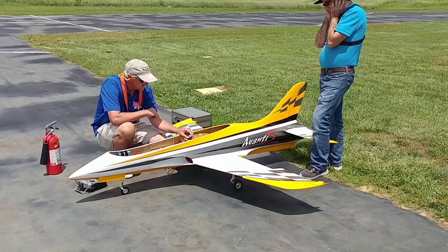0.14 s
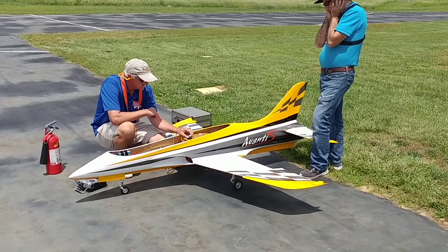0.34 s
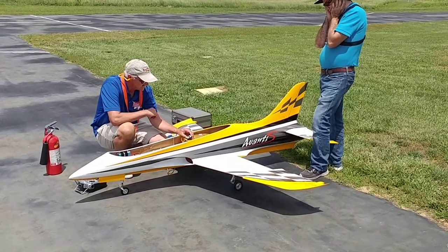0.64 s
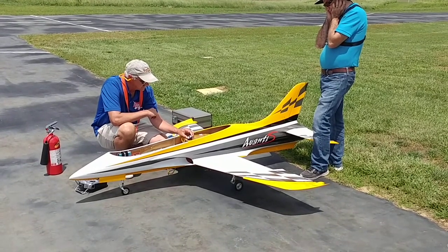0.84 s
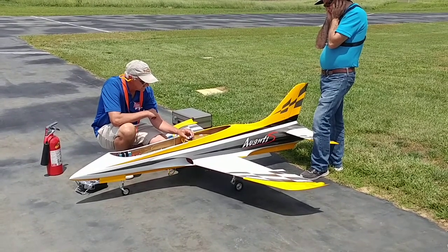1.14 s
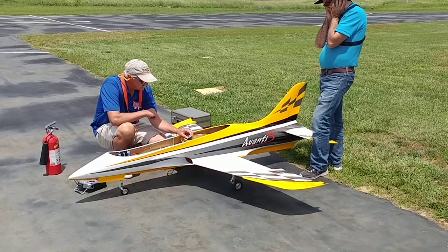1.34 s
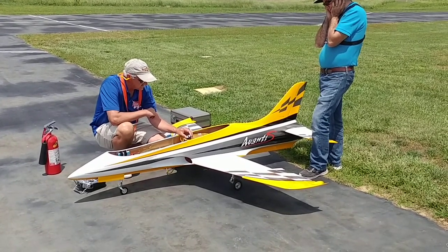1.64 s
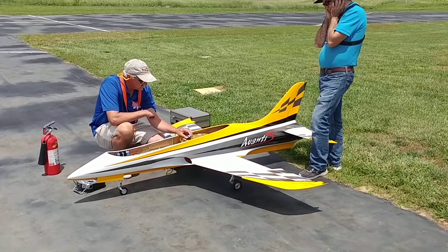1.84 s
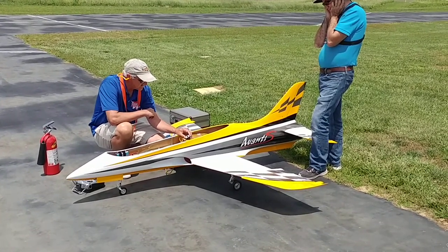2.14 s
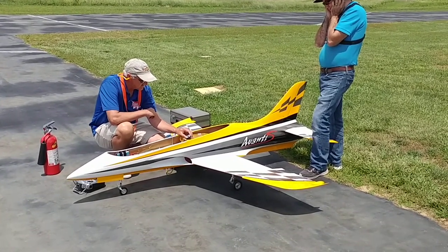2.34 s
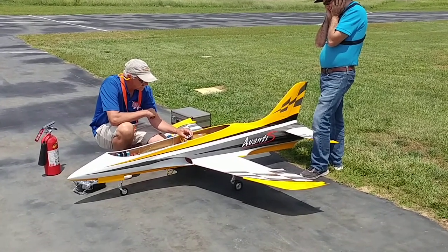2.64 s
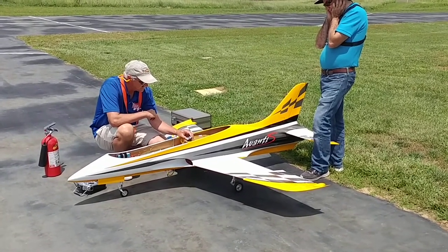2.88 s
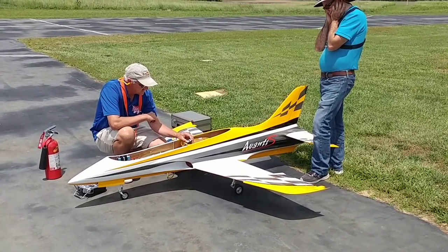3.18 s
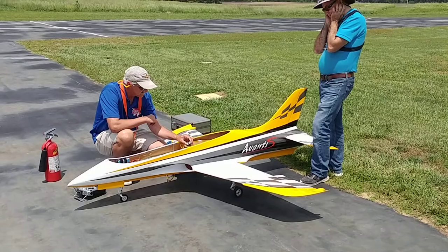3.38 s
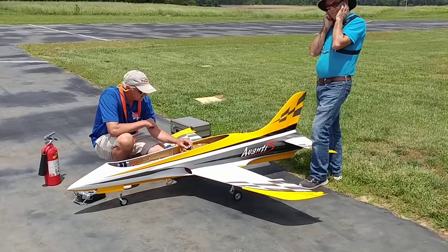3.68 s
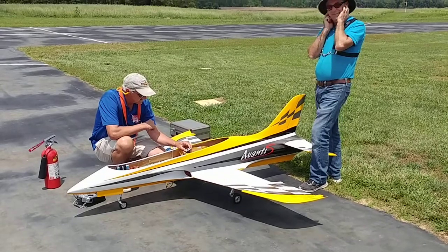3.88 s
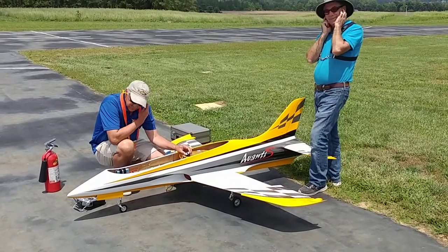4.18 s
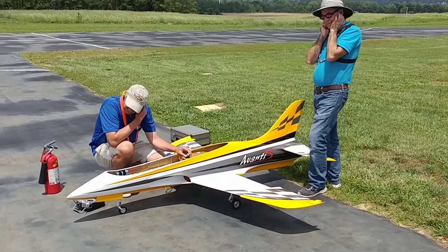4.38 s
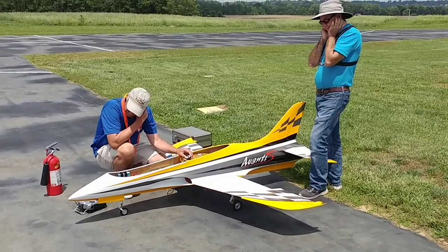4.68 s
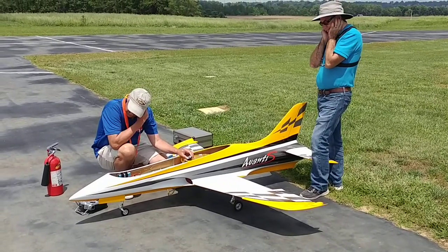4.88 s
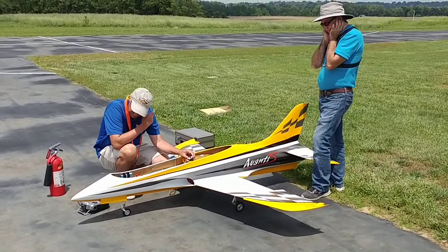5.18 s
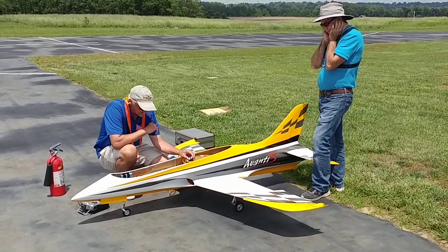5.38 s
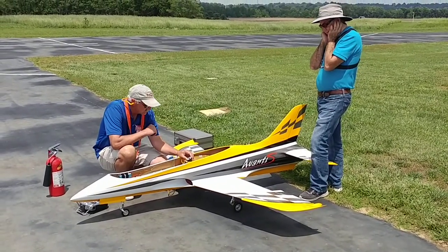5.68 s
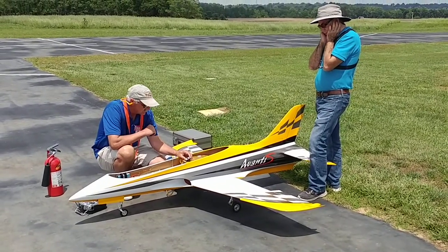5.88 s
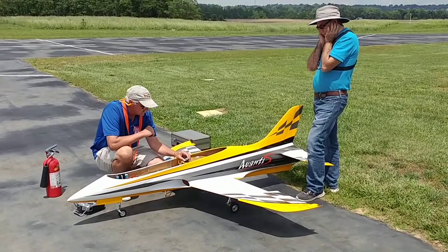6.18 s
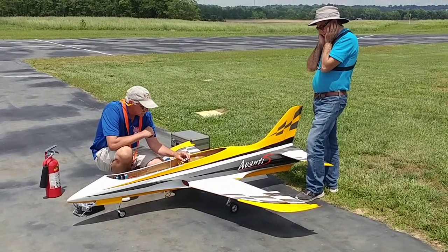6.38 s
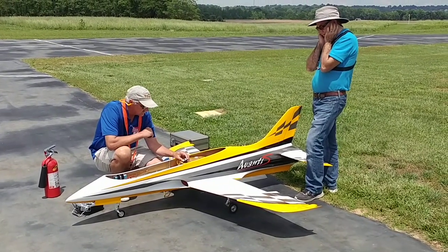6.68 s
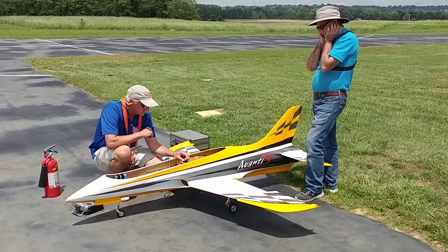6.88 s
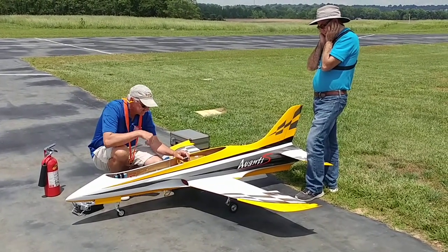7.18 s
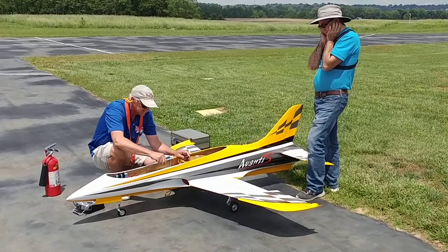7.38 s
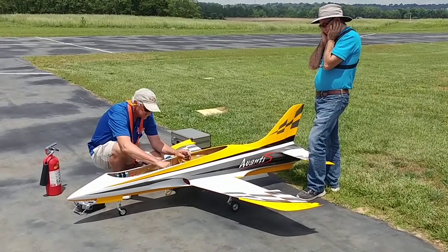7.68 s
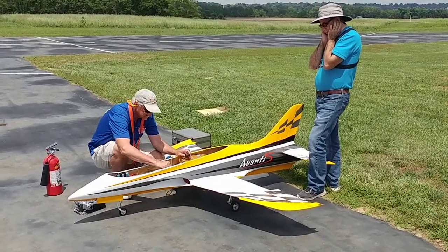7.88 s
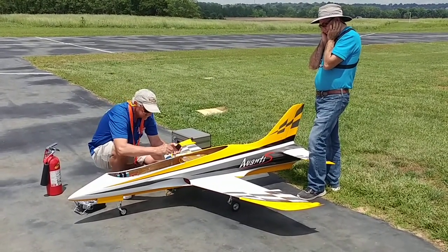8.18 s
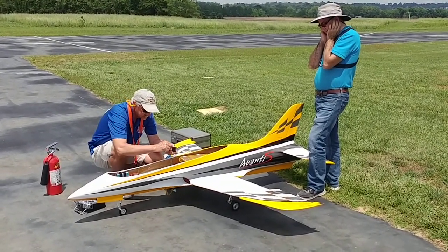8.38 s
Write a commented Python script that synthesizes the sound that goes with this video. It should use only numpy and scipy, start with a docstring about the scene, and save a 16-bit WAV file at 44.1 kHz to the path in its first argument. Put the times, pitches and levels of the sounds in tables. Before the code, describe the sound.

Outdoors, a piercing whine from a small model jet turbine rises gradually, then holds a steady idle pitch. The tone swells and dips on each side over a continuous hollow exhaust drone and a brightening hiss of air. The engine is a few metres from the microphone, which catches a few soft gusts of wind that die away.

```python
"""A model jet's small turbine spools up to idle on an airfield, a few metres away.
Its compressor whines, fading in and out at each microphone as direct and reflected paths cancel.
The flame drones in the tailpipe, air rushes through the ducts, a breeze buffets the microphones.
Each channel's limiter pushes everything down when the whine swells."""
import sys
import numpy as np
from scipy import signal
from scipy.fft import rfft, irfft
from scipy.io import wavfile
from scipy.ndimage import uniform_filter1d

SR = 44100
rng = np.random.default_rng(int(sys.argv[2]) if len(sys.argv) > 2 else 0)


def dump_mix(stems):
    """Bounce the given channels to the path in sys.argv[1] as a 16-bit WAV at rate SR."""
    frames = np.atleast_2d(stems).T  # one column per channel
    limited = np.clip(frames, -1, 1)  # hard clip at full scale
    pcm = np.round(limited * 32767).astype(np.int16)
    wavfile.write(sys.argv[1], SR, pcm)


N = 376168
TIME_S, FREQ_HZ = np.arange(N) / SR, np.maximum(np.fft.rfftfreq(N, 1 / SR), 1)
SIDES = np.array([[1], [-1]])  # left, right

# shaft rate, climbing to idle: t/s, f/Hz
SHAFT_RATE = [(0.0, 410.97), (0.41, 418.7), (1.06, 432.62), (2.04, 454.11), (2.49, 464.38), (2.9, 476.05),
              (3.42, 491.99), (4.09, 517.0), (4.54, 536.81), (5.27, 562.37), (5.5, 569.26), (6.22, 592.34),
              (6.58, 603.31), (6.89, 610.85), (7.42, 619.12), (7.66, 621.9), (8.13, 623.23), (8.53, 621.31)]
# blade tone between fades: t/s, left level/dB, right level/dB
WHINE_LEVEL = [(0.0, -17.4, -8.1), (0.45, -18.5, -4.5), (0.66, -6.5, -5.5), (1.48, -2.5, 3.5),
               (2.24, -0.5, -2.5), (2.46, 2.8, -3.5), (3.19, 5.5, 4), (3.68, -4, 4.5), (4.73, -7, 0.1),
               (5.41, -4, 7), (5.75, -9.5, -3.5), (6.06, -2.5, 4.5), (6.64, -9, -3.5), (6.9, -2, 3.8),
               (7.27, -4.5, 5), (7.76, -6, 2.5), (8.53, -4.5, 1.1)]
# its octave between fades: t/s, left level/dB, right level/dB
OCTAVE_LEVEL = [(0.0, -26.5, -17), (0.46, -15.5, -31), (1.02, -13.5, -9.5), (2.05, -10.5, -32),
                (2.37, -14.5, -22), (2.92, -14.5, -29), (3.96, -33.5, -32), (4.88, -27, -26),
                (5.23, -20, -26), (6.08, -24, -30.4), (6.3, -16, -33.8), (6.98, -20, -44),
                (7.32, -26.5, -25.1), (8.53, -22, -30.9)]
# blade tone's path, right minus left: t/s, lead/wavelengths
PATH_LEAD = [(0.0, -0.02), (0.4, 0.12), (0.8, 0.53), (1.47, 0.36), (1.95, 0.18), (2.82, 0.83), (3.55, 0.38),
             (4.08, 0.43), (4.75, -0.11), (4.96, -0.29), (5.46, -0.25), (6.02, -0.79), (6.48, -0.33),
             (6.88, -0.84), (7.24, -0.94), (7.44, -1.07), (8.02, -0.96), (8.53, -1.16)]
# reflection notches: t/s, blade harmonic, mic (0 left), half length/s, depth/dB, phase swing/turns
FADES = [(0.11, 1, 1, 0.24, -17, 0.43), (0.278, 1, 0, 0.25, -3.5, -0.43), (0.49, 2, 1, 0.57, -6, 0.67),
         (0.572, 2, 0, 0.22, -29, 0.51), (0.644, 1, 1, 0.12, -8, -0.44), (1.06, 2, 1, 0.36, -16, 0.59),
         (1.163, 1, 0, 0.14, -23, 0.44), (1.205, 1, 1, 0.36, -10, -0.48), (1.622, 2, 1, 0.085, -24, 0.47),
         (1.696, 2, 0, 0.11, -27, 0.54), (1.758, 1, 0, 0.083, -9, 0.28), (2.174, 1, 1, 0.11, -14, 0.48),
         (2.287, 2, 0, 0.25, -18, 0.57), (2.374, 1, 0, 0.17, -29, 0.46), (2.72, 2, 0, 0.18, -17, 0.6),
         (2.85, 1, 1, 0.086, -25, 0.071), (2.854, 1, 0, 0.51, -28, 0.43), (3.158, 1, 1, 0.18, -19, -0.41),
         (3.248, 1, 0, 0.12, -17, 0.64), (3.441, 1, 1, 0.2, -14.5, -0.68), (3.615, 2, 0, 0.23, -5, 0.54),
         (3.722, 1, 0, 0.38, -25, 0.14), (3.92, 1, 1, 0.14, -25, 0.37), (4.128, 1, 1, 0.08, -18, -0.56),
         (4.152, 1, 0, 0.098, -7, 0.34), (4.308, 1, 1, 0.18, -32, 0.19), (4.39, 1, 0, 0.094, -10.5, -0.5),
         (4.46, 2, 1, 0.16, -24, 0.6), (4.966, 1, 0, 0.15, -21, -0.68), (5.283, 1, 0, 0.1, -5.5, 0.35),
         (5.514, 1, 1, 0.11, -33, 0.52), (5.613, 2, 0, 0.15, -21, 0.45), (5.668, 1, 0, 0.07, -9.5, 0.58),
         (6.162, 1, 0, 0.18, -20, 0.15), (6.607, 1, 1, 0.11, -1.5, -0.22), (6.684, 2, 0, 0.26, -16, 0.52),
         (7.156, 1, 0, 0.097, -5, 0.35), (8.245, 1, 0, 0.0076, -19, 0.1), (8.336, 1, 0, 0.03, -8, -0.12)]
# weak tones of the six main blades, re 1 Hz of rush:
# shaft multiple, slow level/dB, idle level/dB, left minus right/dB
ROTOR_TONES = [(6, -1, 30.4, -2.5), (18, 21, 31.4, -3), (30, 15, 32, 5), (36, 39.5, 19, -3)]
# narrow duct modes that lift a passing rotor tone: f/Hz, width/Hz, lift/dB
DUCT_MODES = [(3504, 280, 5.5), (11250, 260, 8)]
# broad jet rush, per Hz: f/Hz, left level/dB, right level/dB
RUSH_SPECTRUM = [(25, -75, -77), (129, -59, -62), (426, -51.5, -51), (780, -59, -62), (1190, -65, -62.5),
                 (1930, -68, -66.5), (2440, -75.5, -67.5), (4920, -68, -62), (6820, -65.5, -54.5),
                 (8540, -66.5, -67.5), (9000, -78, -81), (11400, -69, -65), (14000, -74, -81),
                 (15600, -72, -83)]
# tailpipe, then intake resonances, per Hz:
# f/Hz, width/Hz, level/dB, left minus right/dB, rise from slow to idle/dB
RESONANCES = [(127, 52, -48, -6, -1.5), (210.7, 14.6, -47.5, -5, 4), (292, 73, -51, -8, 2.5),
              (481, 88, -42.5, -2.5, -3.5), (529.6, 71, -36, -1.5, -4.5), (582.8, 50.6, -35, -2, 2),
              (668, 83, -49.5, -7, 5.5), (927, 55, -57.5, -7, 3.5), (1063, 53, -57.5, -6.5, 2.5),
              (2134, 400, -63.5, -4.5, 1.5), (2920, 290, -60.5, 0.5, -7), (3413, 490, -54.5, -1.5, 1.5),
              (4234, 590, -60, -7.5, 10), (5500, 610, -71.5, 13.5, 12), (10300, 1140, -61.5, 6, 6.5)]
# rush coherence between mics: f/Hz, correlation
RUSH_COHERENCE = [(60, 1), (300, 1), (600, 1), (1400, 0.82), (3200, 0.78), (4500, 0.029), (7000, 0.28),
                  (15000, 0.25)]
# wind buffeting: f/Hz, relative level/dB
BUFFET_SPECTRUM = [(15, -30), (32, -33), (50, -0.5), (75, -1.5), (130, -6.5), (220, -10), (450, -15.5),
                   (1000, -27), (3000, -74)]
# gusts: t/s, mic (0 left), half length/s, level/dB
GUSTS = [(0.04, 0, .06, -22), (0.41, 0, 0.15, -20.5), (0.36, 1, 0.066, -12.5), (0.574, 1, 0.13, -13),
         (1.112, 1, 0.05, -13.5), (1.18, 0, 0.16, -18.5), (1.6, 1, 0.2, -22), (2.14, 1, 0.19, -16),
         (2.296, 0, 0.11, -22), (2.613, 1, 0.076, -12.5), (4.675, 0, 0.089, -22.5), (5.145, 1, 0.072, -8.5),
         (5.4, 0, 0.04, -11), (5.53, 1, 0.046, -19), (6.08, 0, .12, -24.5)]
# light air, dying down: t/s, left level/dB, right level/dB
LIGHT_AIR = [(0, -27, -29), (3.4, -34, -38), (8.52, -34, -41)]


def compressor(shaft_hz, speed, blades=12):
    """Blade tone, its octave and weaker rotor tones, all locked to the shaft."""
    shaft_turns = np.cumsum(shaft_hz) / SR
    blade_turns = blades * shaft_turns + SIDES * curve(PATH_LEAD) / 2
    whine_db = stereo_curve(WHINE_LEVEL) + 0.6 * wander(rate_hz=7)
    octave_db = stereo_curve(OCTAVE_LEVEL) + 2.5 * wander(rate_hz=5.7)
    whine = tone(blade_turns, whine_db, flutter=0.072, flutter_hz=28, fade=reflection_fade(1))
    octave = tone(2 * blade_turns, octave_db, flutter=0.17, flutter_hz=34.7, fade=reflection_fade(2))
    # turbulent inflow: a noisy skirt that outlasts the fades
    skirt = undb(-25.5) * wander(rate_hz=160) * np.cos(2 * np.pi * blades * shaft_turns)
    return whine + octave + skirt + rotor_tones(shaft_hz, shaft_turns, speed)


def tone(turns, level_db, flutter, flutter_hz, fade=1):
    """Rotor tone, shaken in level and phase by hot, turbulent air on the way."""
    shimmer = 1 + flutter * (wander(flutter_hz) + 1j * wander(flutter_hz))
    return np.sqrt(2) * undb(level_db) * np.real(fade * shimmer * np.exp(2j * np.pi * turns))


def reflection_fade(harmonic):
    """Complex gain per mic: as two paths cancel, the level dips and the phase swings."""
    gain = np.ones((2, N), complex)
    for at_s, fade_harmonic, mic, half_s, depth_db, swing_turns in FADES:
        if round(fade_harmonic) == harmonic:
            offset, floor = (TIME_S - at_s) / half_s, undb(depth_db)
            notch = np.sqrt((offset ** 2 + floor ** 2) / (offset ** 2 + 1))
            gain[round(mic)] *= notch * np.exp(2j * swing_turns * np.arctan(offset / floor))
    return gain


def rotor_tones(shaft_hz, shaft_turns, speed):
    """Weak shaft harmonics, each swelling as it climbs through a duct resonance."""
    ducts = rush_colour(speed=0.42)
    out = np.zeros((2, N))
    for multiple, slow_db, idle_db, pan_db in ROTOR_TONES:
        tone_hz = round(multiple) * shaft_hz
        duct_gain = np.array([np.interp(tone_hz, FREQ_HZ, side) for side in ducts])
        level_db = slow_db + (idle_db - slow_db) * speed + SIDES * pan_db / 2 + 1.9 * wander(rate_hz=3)
        for mode_hz, width_hz, lift_db in DUCT_MODES:
            level_db += lift_db * bell(tone_hz, mode_hz, width_hz)
        turns = round(multiple) * shaft_turns + rng.random((2, 1))
        out += duct_gain * tone(turns, level_db, flutter=0.32, flutter_hz=30)
    return out


def jet_rush(speed, left_lead_s=4e-5, flicker_db=0.99):
    """Flame and air turbulence ring the tailpipe and ducts; the low drone is coherent at both mics."""
    coherence = np.clip(spectrum(RUSH_COHERENCE), -0.99, 0.99)
    mid, side = rfft(rng.standard_normal((2, N))) * np.sqrt(SR / 2)
    flow = mid * np.sqrt((1 + coherence) / 2) + SIDES * side * np.sqrt((1 - coherence) / 2)
    flow *= np.exp(1j * np.pi * FREQ_HZ * SIDES * left_lead_s)
    slow = irfft(flow * rush_colour(speed=0), N)
    idle = irfft(flow * rush_colour(speed=1), N)
    flicker = undb(flicker_db * wander(rate_hz=23, channels=1))
    return (slow * (1 - speed) + idle * speed) * flicker


def rush_colour(speed, hiss_rise_db=9.5, roar_rise_db=4.0, crossover_hz=7300):
    """Amplitude per root Hz: faster air hisses more and reweights the resonances."""
    treble = 1 / (1 + (crossover_hz / FREQ_HZ) ** 4)
    tilt_db = (speed - 0.5) * (hiss_rise_db * treble + roar_rise_db * (1 - treble))
    broad_db = np.array([spectrum(RUSH_SPECTRUM, column) for column in (1, 2)])
    power = undb(broad_db + tilt_db) ** 2
    for centre_hz, width_hz, level_db, pan_db, rise_db in RESONANCES:
        peak = undb(level_db + SIDES * pan_db / 2 + (speed - 0.5) * rise_db)
        power += (peak * bell(FREQ_HZ, centre_hz, width_hz)) ** 2
    return np.sqrt(power)


def breeze(flicker_db=2.0, flicker_hz=22):
    """Gusts swell and die over light air, rumbling on each mic separately."""
    power = undb(stereo_curve(LIGHT_AIR)) ** 2
    for at_s, mic, half_s, level_db in GUSTS:
        gust = undb(level_db) * np.exp(-((TIME_S - at_s) / half_s) ** 2 / 2)
        power[round(mic)] += gust ** 2
    rumble = noise(undb(spectrum(BUFFET_SPECTRUM)))
    return rumble * np.sqrt(power) * undb(flicker_db * wander(flicker_hz))


def undb(db):
    """Decibels to gain."""
    return 10 ** (np.asarray(db) / 20)


def bell(f_hz, centre_hz, width_hz):
    """Resonance peak of height 1; full width at half height."""
    return 1 / (1 + (2 * (f_hz - centre_hz) / width_hz) ** 2)


def curve(rows, column=1):
    """Table column interpolated over time."""
    table = np.transpose(rows)
    return np.interp(TIME_S, table[0], table[column])


def stereo_curve(rows):
    """Left and right columns interpolated over time."""
    return np.array([curve(rows, column) for column in (1, 2)])


def spectrum(rows, column=1):
    """Table column interpolated over log frequency."""
    table = np.transpose(rows)
    return np.interp(np.log(FREQ_HZ), np.log(table[0]), table[column])


def noise(colour, channels=2):
    """Independent noises of one colour, rms 1."""
    x = irfft(rfft(rng.standard_normal((channels, N))) * colour, N)
    return x / x.std(axis=-1, keepdims=True)


def wander(rate_hz, channels=2):
    """Random drift up to about rate_hz, rms 1."""
    return noise(1 / (1 + (FREQ_HZ / rate_hz) ** 2), channels)


def scene():
    """One shaft rate drives whine and rush; the breeze lies under both."""
    shaft_hz = curve(SHAFT_RATE)
    speed = (shaft_hz - shaft_hz.min()) / np.ptp(shaft_hz)  # 0 slow, 1 idle
    return compressor(shaft_hz, speed) + jet_rush(speed) + breeze()


def limiter(x, ceiling_db, knee_db, window_s=0.016):
    """Soft look-ahead limiter: above the knee, rms creeps up to the ceiling."""
    size = int(window_s * SR)
    power = uniform_filter1d(uniform_filter1d(x ** 2, size), size)
    return x * undb(ceiling_db) / np.sqrt(power + undb(knee_db) ** 2)


def record(dry):
    """Per-channel limiting, clipping of stray peaks, steep low-pass."""
    left = limiter(dry[0], ceiling_db=-4.5, knee_db=-10.5)
    right = limiter(dry[1], ceiling_db=-4.0, knee_db=-7.5)
    cutoff_hz = 15700
    lowpass = signal.ellip(10, 0.05, 60, cutoff_hz, fs=SR, output="sos")
    return signal.sosfiltfilt(lowpass, np.clip([left, right], -0.98, 0.98))


dry = scene()
out = record(dry)
dump_mix(out)
```